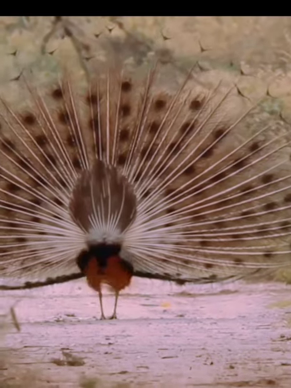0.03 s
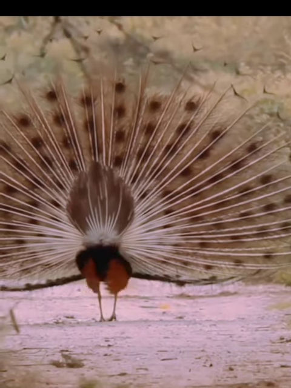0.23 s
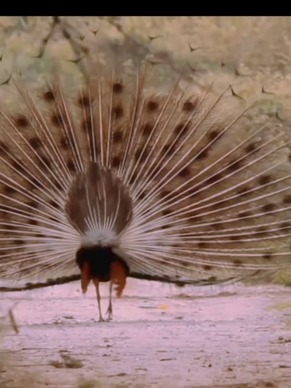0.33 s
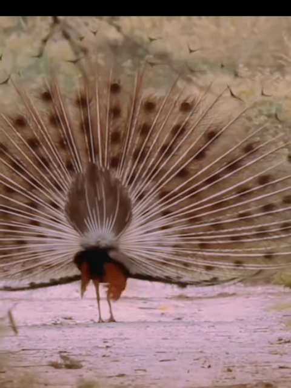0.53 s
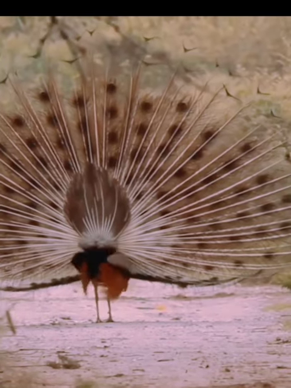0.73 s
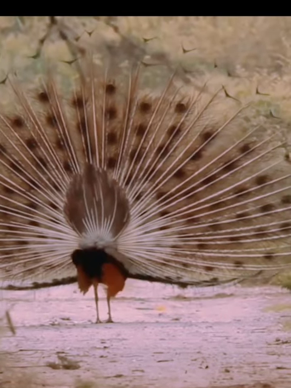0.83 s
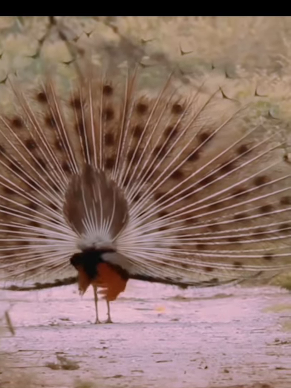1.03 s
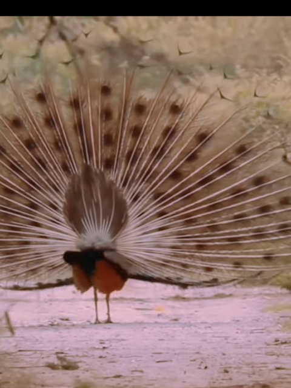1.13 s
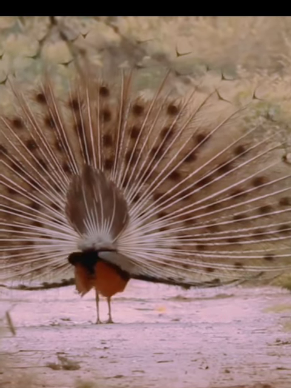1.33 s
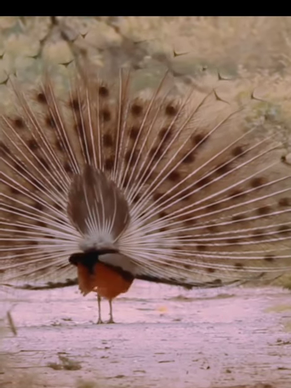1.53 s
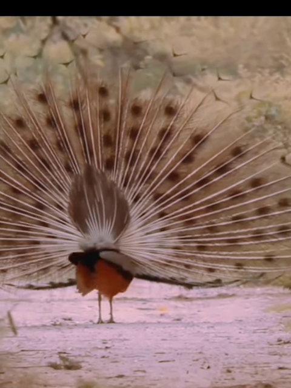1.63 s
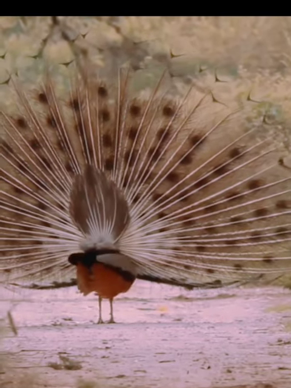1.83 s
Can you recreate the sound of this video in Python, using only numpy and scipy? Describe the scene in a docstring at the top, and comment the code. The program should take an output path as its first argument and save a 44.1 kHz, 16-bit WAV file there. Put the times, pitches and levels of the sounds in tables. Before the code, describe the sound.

Single loud nasal peacock call swoops up and sags, leaving a short echo in quiet open air.

```python
"""A low gust, hissy open air and quick chirps of small distant birds come first; then a peacock honks once, loudly.
The honk is a reedy tone that swoops up and sags: a sum of harmonics sliding through the resonances of the windpipe.
Delayed copies beat against the falling note, and decaying noise bands make a diffuse tail in the trees.
The chirps are gliding sines; the air is filtered noise with a faint wavering hum, and more chirps follow the call."""
import sys
import numpy as np
from scipy import signal
from scipy.fft import rfft, irfft, next_fast_len
from scipy.io import wavfile
from scipy.ndimage import uniform_filter1d

SR = 44100
rng = np.random.default_rng(int(sys.argv[2]) if len(sys.argv) > 2 else 0)


def put_to_file(sound):
    """Save the sound as 16-bit audio at rate SR, in the file named by the first command-line argument."""
    columns = np.atleast_2d(sound).T  # one column per channel
    safe = np.clip(columns, -1, 1)
    whole_steps = np.round(safe * 32767)
    wavfile.write(sys.argv[1], SR, whole_steps.astype(np.int16))


N = 83790

# spectrum of the open air, before scaling to AIR_DB: frequency_hz, relative_density_db
AIR_SPECTRUM = [(25,-28), (50,-4.5), (80,-0.5), (125,1), (172,-3), (354,-11.5), (620,-17), (1090,-23.5),
                (1500,-25.5), (2850,-30), (5000,-32.5), (6800,-40.5), (9000,-49.5), (12000,-52),
                (15000,-55)]
# changes of the air's level: time_s, rumble_db, hiss_db
AIR_CHANGES = [(0, 1, 13.5), (.1, 10, 9), (.21, 8.5, 11.5), (.28, 2, 1.5), (.5, -3.5, -2), (.9, -2.5, 1),
               (1.2, 0.5, -0.5), (1.5, 0, 0.5), (1.7, 1.5, 2.5), (1.89, 2, 2.5)]
# stereo balance of the background: frequency_hz, left_minus_right_db
AIR_BALANCE = [(60, 0.5), (170, 0.7), (400, 5), (2000, 7), (8000, 0)]
# whistles of small distant birds: start_s, length_s, start_hz, middle_hz, end_hz, level_db
CHIRP_ARCS = [(0.016, 0.035, 5500, 5230, 5020, -48.5), (0.038, 0.029, 7000, 7070, 7000, -49),
              (0.089, 0.039, 4700, 4330, 4100, -41.5), (.118, 0.065, 4150, 3720, 3130, -39.5),
              (1.416, .045, 3050, 3470, 2900, -56.5), (1.645, 0.045, 4800, 5010, 5300, -47),
              (1.662, 0.084, 4500, 3840, 3700, -50.5), (1.694, 0.03, 4800, 5300, 4900, -51.5),
              (1.713, 0.037, 3900, 4600, 4230, -47.5), (1.73, 0.039, 3050, 3150, 2900, -49),
              (1.787, 0.037, 3800, 4310, 4500, -53), (1.883, 0.026, 7560, 7440, 7450, -53)]
# diffuse tail from the trees: frequency_hz, level_db, t60_s
TREE_TAIL = [(587, -5, 0.88), (1110, -22.5, 1.08), (1436, -15.5, 1.49), (1700, -15.5, 0.86),
             (3030, -15, 0.75), (4640, -13, 0.64), (8800, -11, 0.32), (14000, -7, 0.16)]
# pitch of the honk: time_s, pitch_hz
HONK_PITCH = [(0.226, 572), (0.238, 553), (0.26, 601.7), (0.28, 629), (0.305, 650.2), (0.345, 662.3),
              (0.39, 661.7), (0.43, 658.6), (0.47, 648.9), (0.52, 643.3), (0.57, 632.9), (0.62, 619.2),
              (0.66, 609.5), (0.7, 593.8), (0.732, 574), (0.752, 555), (0.77, 527)]
# strength of the voice before the throat: time_s, fundamental_db, second_harmonic_db, low_overtones_db,
# high_overtones_db, treble_db, upward_shift_of_resonances_percent
VOICE_STRENGTH = [(.232,-3.5,1.5,0,-11,-13,-0.21), (.25,-5,-3.5,-5,-15,-5,0.63),
                  (.275,-3.5,-4,-3,-4.5,-9,0.23), (.305,-7,-4.5,5,-11.5,5,1.2),
                  (.345,-4,-3,0.5,-0.5,-6.5,0.1), (.41,-8,-7,-7,-3.5,-1.5,0.87),
                  (.46,-2,-2.5,-10.5,-2,-1.5,0.44), (.495,-20,-6,-16,-6,-6,0.43),
                  (.54,-12,-2,-3,-9.5,-9.5,-0.93), (.6,-9,-5.5,-10.5,-9,-11,0.11),
                  (.66,-7.5,-4.5,-9,-14.5,-3,0.28), (.7,-7.5,-5,-13.5,-12,-10,1.62),
                  (.74,-14.5,-5,-10.5,-6,-14.5,1.1), (.765,-2.5,-7.5,-9,-2,-23,-1.4)]
# the voice starts harsh, clears, and frays again: time_s, phase_jitter_rad, rasp_db
VOICE_ROUGHNESS = [(.23,0.069,-7), (.27,0.044,-7), (.31,0.034,-30), (.40,0.011,-36), (.50,0.019,-31),
                   (.60,0.0096,-36), (.70,0.0089,-17), (.76,0.02,-24)]
# resonances of windpipe and beak: frequency_hz, width_hz, level_db
THROAT_RESONANCES = [(669.6,80,-21.5), (1286,259,-5), (1730,283,-17.5), (2330,245,-20.5), (3044,190,-15),
                     (4150,594,-16.5), (5150,295,-9.5), (6372,310,-27), (7100,940,-39), (8157,570,-32),
                     (9340,640,-39), (10520,310,-38.5), (11310,470,-44.5), (12600,440,-46.5),
                     (13850,890,-57), (15000,440,-58)]
# hollows between the resonances: frequency_hz, width_hz, depth_db
THROAT_HOLLOWS = [(1931,38,13), (3795,251,20), (4900,585,25)]
# distinct echoes, before their colour: delay_s, level_db
ECHO_DELAYS = [(.04159, -9.7), (.10165, -21.7), (.13633, -28)]
# colour of the echoes: frequency_hz, gain_db
ECHO_SPECTRUM = [(600, -21.5), (1350, 2.5), (1700, -11), (5000, -23), (12000, -24)]
# stereo balance of the peacock: frequency_hz, left_minus_right_db
CALL_BALANCE = [(650, 2), (1280, 5), (2300, 2), (4400, 1), (8000, 0.7), (14000, -3)]

AIR_DB = -42.5   # rms, before AIR_CHANGES
RUMBLE_TOP_HZ, AIR_WIDTH = 380, 0.12   # width: side noise relative to mid
GUST_END_S, GUST_FADE_S, GUST_HZ, GUST_DB = 0.28, 0.06, 49, -43   # low gust, fading as the call begins
HUM_HZ, HUM_DB, HUM_WAVER_RAD, HUM_WAVER_HZ = 120, -50.5, 0.67, 5.6
CHIRP_WAVER, CHIRP_WAVER_HZ = 0.031, 148   # spread as a fraction of pitch, and its rate
CHIRP_WET_DB = 9   # gain of the chirps sent through the trees
TAIL_BUILD_S, TAIL_WIDTH = 0.052, 0.21
CALL_START_S, ATTACK_S, CALL_END_S, RELEASE_S = 0.2268, 0.0093, 0.767, 0.0087
HARMONICS = 27
LOW_OVERTONES_HZ = 2310   # top of the low overtones
OVERTONES_HZ, TREBLE_HZ = 2900, 9500   # where the levels of the high overtones and the treble apply
JITTER_HZ, FLUTTER_HZ = 99, 15   # rates of the random wander in phase and level
FLUTTER_DB, TREBLE_FLUTTER_DB = 2, 1   # spread of overtone level, and the extra spread in the treble
RASP_HZ = 5950   # the rasp thins out below this
STOPBAND_HZ, STOPBAND_DB = 15900, 70

TIME = np.arange(N) / SR
SIZE = next_fast_len(2 * N)   # padded so that filtered sounds do not wrap round
FREQS = np.maximum(np.arange(SIZE // 2 + 1) * SR / SIZE, 1)


def from_db(db):
    """The decibel is logarithmic: 20 dB is a factor of ten in amplitude."""
    return 10 ** (np.asarray(db) / 20)


def rms_one(x):
    """Normalization: dividing by the root mean square gives unit rms."""
    return x / np.sqrt(np.mean(x ** 2) + 1e-20)


def in_time(rows, t=TIME):
    """Linear interpolation: each column of a curve, joined by straight lines in time."""
    s, *columns = np.transpose(rows)
    return [np.interp(t, s, c) for c in columns]


def at_hz(rows, hz):
    """Logarithmic frequency axis: equal musical intervals take equal lengths."""
    rows = np.array(rows)
    return np.interp(np.log(hz), np.log(rows[:, 0]), rows[:, 1])


def colour(x, gain):
    """Linear filtering: the spectrum is multiplied by a gain given at FREQS."""
    return irfft(rfft(x, SIZE) * gain, SIZE)[..., :N]


def drift(rate_hz):
    """Low-pass filtered noise: a smooth random wander of unit rms."""
    return rms_one(colour(rng.standard_normal(N), 1 / (1 + (FREQS / rate_hz) ** 2)))


def panned(x, balance):
    """Interaural level difference: each frequency is shared between left and right."""
    left_right = np.array([[0.5], [-0.5]])
    return colour(x, from_db(at_hz(balance, FREQS) * left_right))


def wide_noise(width):
    """Mid and side noise: a small side part leaves the two channels mostly alike."""
    mid, side = rng.standard_normal((2, N))
    return mid + width * side * np.array([[1], [-1]])


def bell(hz, centre, width):
    """Lorentzian resonance curve: one at the centre, one half at half a width to either side."""
    return 1 / (1 + (2 * (hz - centre) / width) ** 2)


def gust():
    """Resonant band of noise: a deep rush, steady at first and then faded out."""
    rush = rms_one(colour(wide_noise(AIR_WIDTH), bell(FREQS, GUST_HZ, GUST_HZ / 2)))
    fade = np.clip((GUST_END_S - TIME) / GUST_FADE_S, 0, 1)
    return from_db(GUST_DB) * rush * fade


def hum():
    """Phase modulation: a steady sine wavers as its phase wanders."""
    phase = 2 * np.pi * HUM_HZ * TIME + HUM_WAVER_RAD * drift(HUM_WAVER_HZ)
    return from_db(HUM_DB) * np.sin(phase)


def background():
    """Spectral shaping of noise: open air is split into rumble and hiss, joined by gust and hum."""
    shaped = colour(wide_noise(AIR_WIDTH), from_db(at_hz(AIR_SPECTRUM, FREQS)))
    air = from_db(AIR_DB) * rms_one(shaped)
    rumble = colour(air, 1 / (1 + (FREQS / RUMBLE_TOP_HZ) ** 2))
    hiss = air - rumble
    rumble_db, hiss_db = in_time(AIR_CHANGES)
    moving_air = from_db(rumble_db) * rumble + from_db(hiss_db) * hiss
    return panned(moving_air + gust() + hum(), AIR_BALANCE)


def small_birds():
    """Frequency modulation: short wavering whistles, each an arc through three pitches."""
    chirps = np.zeros(N)
    waver = 1 + CHIRP_WAVER * drift(CHIRP_WAVER_HZ)
    for start, length, first_hz, middle_hz, last_hz, db in CHIRP_ARCS:
        progress = np.clip((TIME - start) / length, 0, 1)
        parabola = np.polyfit([0, 0.5, 1], [first_hz, middle_hz, last_hz], 2)
        hz = np.polyval(parabola, progress) * waver
        swell = np.sin(np.pi * progress)
        chirps += from_db(db) * swell * np.sin(2 * np.pi * np.cumsum(hz) / SR)
    return chirps


def trees():
    """Scattering by foliage: the response builds up, then each band decays at its own rate."""
    noise, response = wide_noise(TAIL_WIDTH), 0
    centres = np.log([row[0] for row in TREE_TAIL])
    # each share is a triangle on the log-frequency axis; the outermost ones stay flat to the edge
    for share, (hz, db, t60) in zip(np.eye(len(TREE_TAIL)), TREE_TAIL):
        build_up = np.minimum(TIME / TAIL_BUILD_S, 1)
        envelope = from_db(-60 * TIME / t60) * build_up
        band = colour(noise, np.interp(np.log(FREQS), centres, share))
        unit_energy = envelope / np.sqrt(np.sum(envelope ** 2))
        response = response + from_db(db) * band * unit_energy
    return rfft(response, SIZE)


def throat_db(hz):
    """Formants: resonances of windpipe and beak add in power, and hollows cut between them."""
    peaks = sum((from_db(db) * bell(hz, centre, width)) ** 2 for centre, width, db in THROAT_RESONANCES)
    hollows = sum(depth * bell(hz, centre, width) for centre, width, depth in THROAT_HOLLOWS)
    return 10 * np.log10(peaks) - hollows


def throat_lag(hz):
    """Phase lag of resonance: each one adds half a turn between far below and far above it."""
    return sum(np.arctan(2 * (hz - centre) / width) for centre, width, db in THROAT_RESONANCES)


def throat_rasp(phase, pitch):
    """Amplitude-modulated turbulence: noise pulses on every cycle and is shaped by the throat."""
    puffs = rng.standard_normal(N) * (1 + np.cos(phase))
    high_pass = FREQS ** 2 / (FREQS ** 2 + RASP_HZ ** 2)
    return colour(puffs, from_db(throat_db(FREQS)) * high_pass) * np.sqrt(SR / pitch)


def honk():
    """Source and filter: harmonics of one jittering pitch and a rasp, shaped by the throat."""
    pitch = uniform_filter1d(in_time(HONK_PITCH)[0], size=530)   # rounds the corners over 12 ms
    jitter, rasp_db = in_time(VOICE_ROUGHNESS)
    phase = 2 * np.pi * np.cumsum(pitch) / SR + jitter * drift(JITTER_HZ)
    attack = np.clip((TIME - CALL_START_S) / ATTACK_S, 0, 1)
    release = np.clip((CALL_END_S - TIME) / RELEASE_S, 0, 1)
    gate = attack * release
    on = gate > 0
    first_db, second_db, low_db, high_db, treble_db, shift = in_time(VOICE_STRENGTH, TIME[on])
    stretch = 1 + shift / 100
    voice = np.zeros(N)
    for k in range(1, HARMONICS + 1):
        hz = k * pitch[on]
        low = np.interp(hz, [LOW_OVERTONES_HZ, OVERTONES_HZ], [1, 0])
        treble = np.interp(hz, [OVERTONES_HZ, TREBLE_HZ], [0, 1])
        flutter_db = (FLUTTER_DB + TREBLE_FLUTTER_DB * treble) * drift(FLUTTER_HZ)[on]
        if k == 1:
            db = first_db
        elif k == 2:
            db = second_db
        else:   # only these overtones flutter
            db = low * low_db + (1 - low - treble) * high_db + treble * treble_db + flutter_db
        # reading the throat at hz / stretch moves its resonances up by the shift
        gain = from_db(db + throat_db(hz / stretch))
        voice[on] += gain * np.cos(k * phase[on] - throat_lag(hz.mean()))
    voice[on] += from_db(treble_db + rasp_db[on]) * throat_rasp(phase, pitch)[on]
    return voice * gate


def echoes(x):
    """Reflection: a few late copies of the sound, coloured alike."""
    # a delay turns the phase in proportion to frequency
    delays = sum(from_db(db) * np.exp(-2j * np.pi * FREQS * s) for s, db in ECHO_DELAYS)
    return colour(x, delays * from_db(at_hz(ECHO_SPECTRUM, FREQS)))


def scene():
    """Superposition: the peacock near by, small birds deep among the trees, open air around."""
    call, chirps, foliage = honk(), small_birds(), trees()
    peacock = panned(call + echoes(call) + colour(call, foliage), CALL_BALANCE)
    distant_birds = chirps + from_db(CHIRP_WET_DB) * colour(chirps, foliage)
    return peacock + distant_birds + background()


def record(dry):
    """Band limitation: a steep low-pass removes the top of the spectrum."""
    low_pass = signal.cheby2(16, STOPBAND_DB, STOPBAND_HZ, fs=SR, output="sos")
    return signal.sosfilt(low_pass, dry)


dry = scene()
out = record(dry)
put_to_file(out)
```